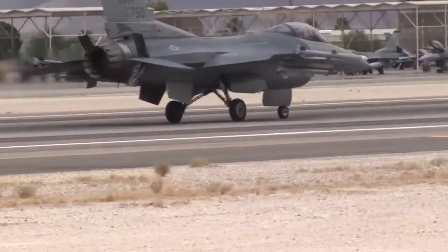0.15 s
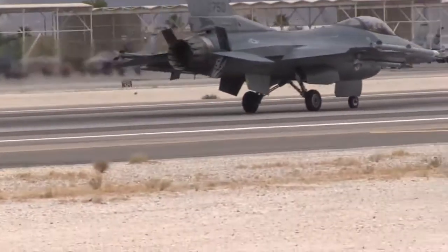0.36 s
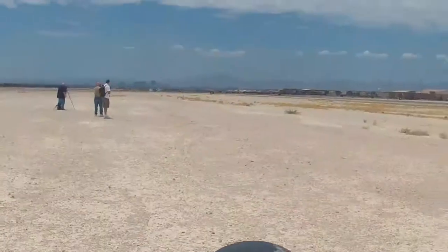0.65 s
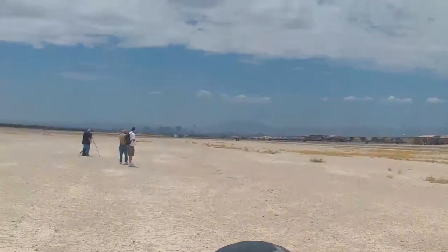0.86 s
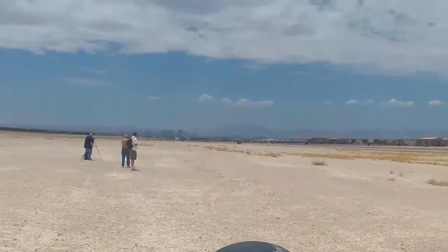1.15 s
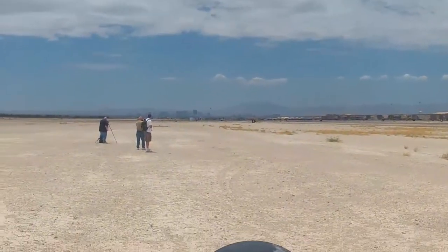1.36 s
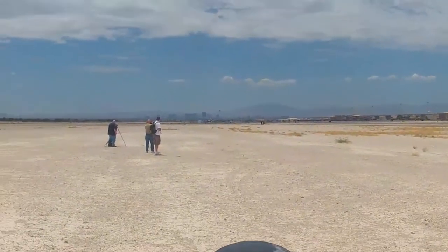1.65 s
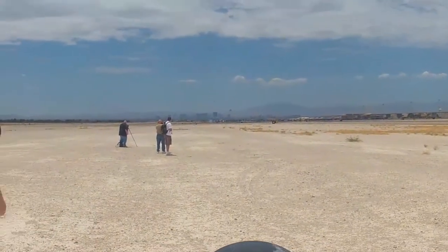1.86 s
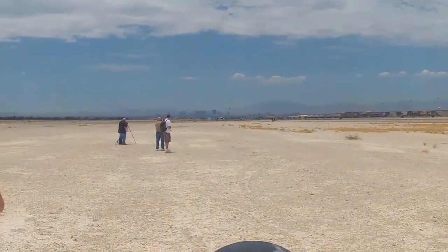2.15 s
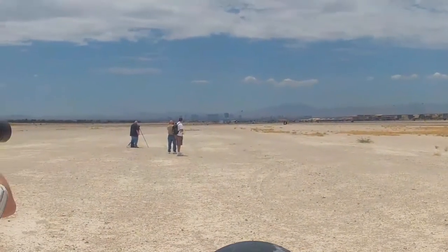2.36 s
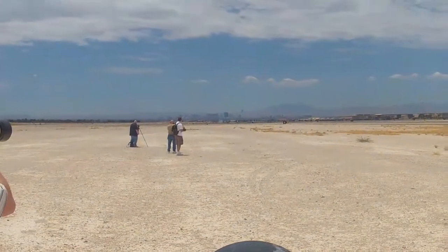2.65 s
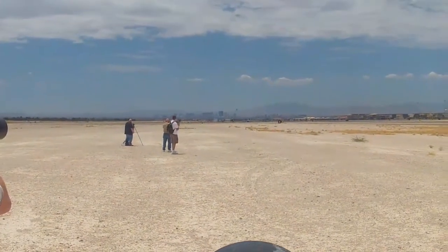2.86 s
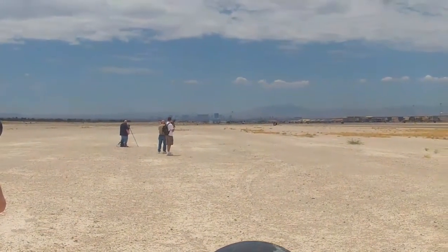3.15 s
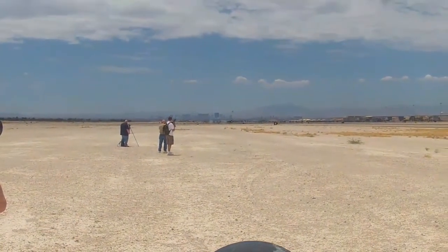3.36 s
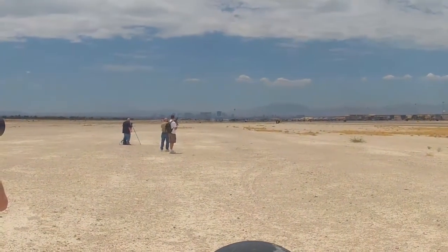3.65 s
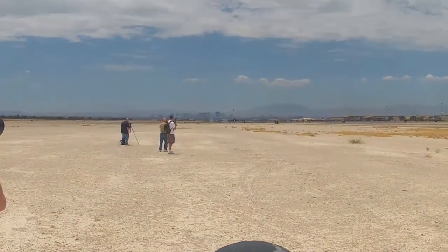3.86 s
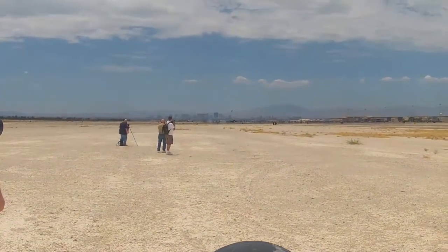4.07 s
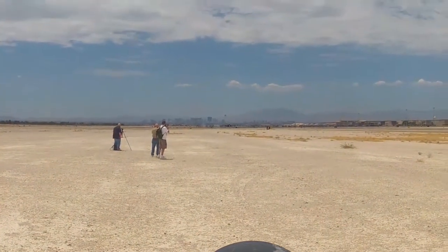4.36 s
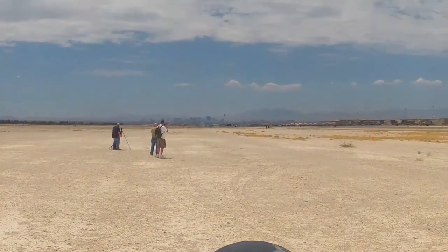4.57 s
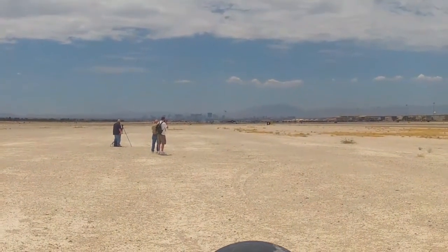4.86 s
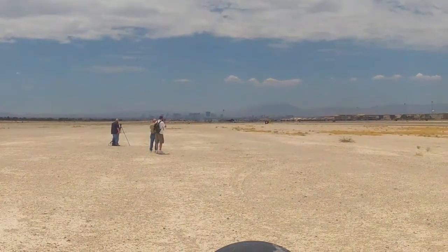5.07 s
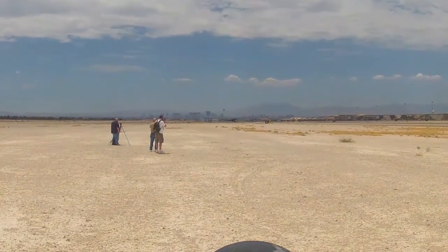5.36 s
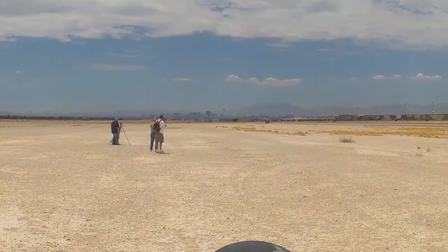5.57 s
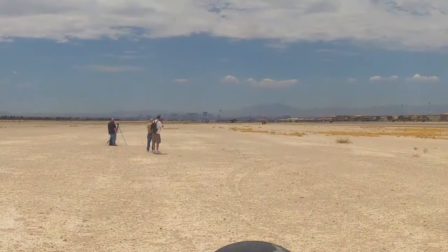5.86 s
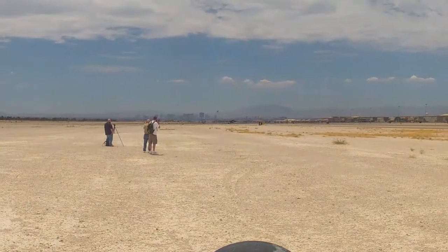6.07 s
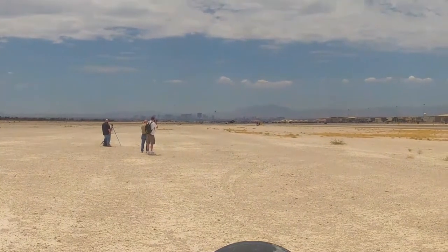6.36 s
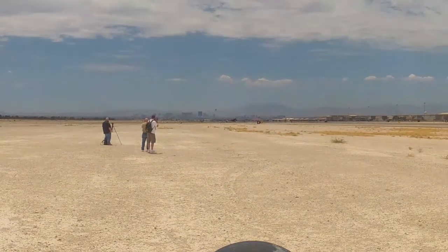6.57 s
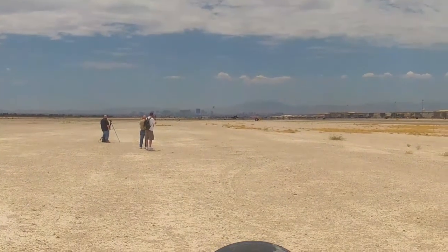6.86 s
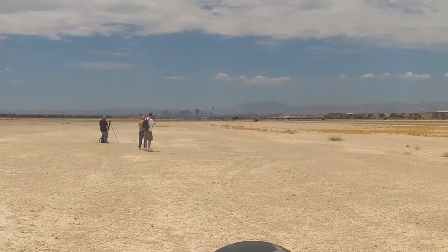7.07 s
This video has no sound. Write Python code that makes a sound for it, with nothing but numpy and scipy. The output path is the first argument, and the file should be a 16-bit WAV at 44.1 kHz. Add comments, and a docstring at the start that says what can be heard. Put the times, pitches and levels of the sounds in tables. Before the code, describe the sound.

A short, loud jet rush gives way abruptly to quiet airfield rumble, with far helicopter blades and close taps on plastic.

```python
"""Beside a runway, in stereo: a fighter jet rolls out, exhaust roaring and turbine whining.
An abrupt cut leads to a quiet desert airfield, heard in mono on a small camera's microphone.
Far engines rumble, and a helicopter slowly comes nearer, its blades slapping the air.
Right at the microphone, the plastic case is knocked and rubbed; the camera hisses and starts to hum."""
import sys
import numpy as np
from scipy import signal
from scipy.fft import rfft, irfft, next_fast_len
from scipy.io import wavfile
from scipy.ndimage import map_coordinates

SR = 44100
rng = np.random.default_rng(int(sys.argv[2]) if len(sys.argv) > 2 else 0)


def store_pcm(level_fs):
    """Save levels as 16-bit WAV."""
    pcm = np.round(np.clip(level_fs, -1, 1) * 32767).astype(np.int16)
    wavfile.write(sys.argv[1], SR, np.atleast_2d(pcm).T)


N = 317961

# Spectra give shape only: their density_db is a relative level per Hz.
# exhaust roar: freq_hz, density_db
EXHAUST_SPECTRUM = [(30, -49), (65, -30), (110, -16), (170, -5.5), (235, 0), (330, -8.5), (550, -13.5),
                    (630, -8), (710, -17), (820, -11), (930, -20.5), (1500, -77), (6000, -110)]
# turbulent rush of the jet: freq_hz, density_db
RUSH_SPECTRUM = [(500, -40), (1000, 1), (1250, 4.5), (1800, -1.5), (2150, -1), (3400, -4), (3900, -2.5),
                 (4200, 4), (4500, -2), (4900, -0.5), (5300, -7), (7600, -14.5), (9000, -15.5),
                 (11000, -34.5), (11400, -90)]
# two strong fan tones, at FAN_HZ: level_db, wander_hz, swing_at_s, swing_db
FAN_TONES = [(-26.5, 7.6, 0.23, -14), (-29.5, 9.6, 0.24, 2)]
# weaker compressor tones: pitch_hz, level_db, wander_hz
COMPRESSOR_TONES = [(2180, -42, 8), (2672, -38, 5), (3483, -45, 8), (3758, -45, 8), (4985, -41, 14)]
# how alike the jet's noise is left and right: freq_hz, correlation
JET_COHERENCE = [(60, 0.96), (180, 1), (550, 0.88), (1650, 0.65), (4970, 0.89), (15000, 1)]
# where the jet sits in the stereo image: freq_hz, left_minus_right_db
JET_BALANCE = [(700, -4.5), (1300, -0.5), (2400, 0.5)]
# main rotor from afar: freq_hz, density_db
ROTOR_SPECTRUM = [(20, -17), (60, 0.5), (200, -3.5), (450, -0.5), (700, -3.5), (820, -8), (950, -26.5),
                  (1800, -19), (2500, -61), (5000, -100)]
# tail rotor harmonics 1-5: relative_db
TAIL_HARMONICS = [-6.5, -23, -5.5, -5.5, -34]
# fingers tap the case: start_s, snap_db, knock_db
FINGER_TAPS = [(0.493, -31.5, -47), (0.59, -32, -11), (0.61, -32.5, -30), (1.278, -40, -40),
               (1.401, -29.5, -45), (1.475, -40, -30), (1.561, -41, -30), (1.603, -41, -29.5),
               (1.705, -45, -26), (1.755, -42, -22), (3.128, -43, -23.5), (3.371, -37, -28.5),
               (3.471, -37.5, -26.5), (4.633, -30.5, -40), (7.141, -6.5, -14), (7.153, -14.5, -18)]
# fingers rub the case: start_s, length_s, snap_db, knock_db
FINGER_RUBS = [(1.857, 0.104, -39.5, -33), (7.129, 0.014, -28, -36), (7.187, .03, -19.5, -31)]
# spells of light brushes as the grip shifts: start_s, end_s, snap_db, knock_db
GRIP_SHIFTS = [(0.651, 5.5, -47.5, -42), (1.399, 1.82, -48, -40.5)]
# snap of a contact on plastic: freq_hz, density_db
SNAP_SPECTRUM = [(300, -17.5), (650, -2.5), (1200, -24), (1700, 7), (2400, -1.5), (3000, -11), (3700, -2.5),
                 (4700, -8.5), (6000, -30.5)]
# bright modes of the case: pitch_hz, width_hz, relative_db
BRIGHT_MODES = [(600, 150, -0.5), (1760, 280, 7.5), (3420, 650, -7)]
# low modes of the case: pitch_hz, width_hz, relative_db
LOW_MODES = [(234, 17, -9), (373, 37, 1.5), (468, 58, 2), (768, 92, 3)]
# soft thuds of the mount: start_s, pitch_hz, level_db, t60_s
MOUNT_THUDS = [(0.593, 231, -20.5, 0.17), (3.519, 313, -24.5, 0.12), (7.143, 196, -28, 0.078)]
# deep boom of the far engines: freq_hz, density_db
BOOM_SPECTRUM = [(12, -17), (24, -23), (33, 3), (62, 2), (90, 3), (200, -61), (1000, -100)]
# rumble of the far engines: freq_hz, density_db
RUMBLE_SPECTRUM = [(40, -8), (75, -2.5), (105, 1), (140, -2), (190, -2.5), (290, -6.5), (400, -11.5),
                   (620, -22), (790, -16.5), (870, -26.5), (1300, -36.5), (4000, -100)]
# the camera's noise floor: freq_hz, density_db
HISS_SPECTRUM = [(300, -30), (900, 3.5), (1250, -3.5), (1800, 5.5), (2900, 3), (3700, -11), (4200, -3),
                 (4600, -14), (6000, -32)]
# narrow resonances in the hiss: pitch_hz, width_hz, relative_db
HISS_BANDS = [(2160, 100, -2.5), (3317, 270, -12.5)]
# electric hum: pitch_hz, level_db, wander_hz
HUM_TONES = [(500, -49.5, .4), (775.2, -43.7, .15)]

CUT_S = 0.448  # from the runway to the desert airfield
FAN_HZ = (2638, 4172)


def jet_exhaust(roar_db=-16.5, rush_db=-20, sizzle_hz=5600):
    """The jet at steady idle power: a low exhaust roar under a turbulent rush."""
    roar = amp(roar_db + 0.59 * wobble(33)) * jet_noise(EXHAUST_SPECTRUM)
    rush = amp(rush_db + wobble(40)) * jet_noise(RUSH_SPECTRUM)
    sizzle = filtered(rush, lambda hz: hz > sizzle_hz)
    flicker = amp(2.6 * wobble(44.5))  # the treble flickers on its own
    return roar + rush + sizzle * (flicker - 1)


def jet_turbine(flutter_db=2, swing_s=0.036):
    """Blade tones flutter in the hot air; each fan tone fades or swells once as the jet passes."""
    whine = np.zeros(N)
    for hz, (db, wander_hz, at_s, swing_db) in zip(FAN_HZ, FAN_TONES):
        swing = np.exp(-((clock() - at_s) / swing_s) ** 2)
        level_db = db + swing_db * swing + flutter_db * wobble(59.5)
        whine += amp(level_db) * tone(hz + wander_hz * wobble(163))
    for hz, db, wander_hz in COMPRESSOR_TONES:
        whine += amp(db + flutter_db * wobble(15)) * tone(hz + wander_hz * wobble(124))
    return whine


def jet_noise(spectrum):
    """Mid-side noise of rms 1, partly alike left and right."""
    width = lambda hz: np.arccos(np.clip(along(JET_COHERENCE, hz), 0, 1)) / 2
    mid = filtered(noise(spectrum), lambda hz: np.cos(width(hz)))
    side = filtered(noise(spectrum), lambda hz: np.sin(width(hz)))
    return unit(np.array([mid + side, mid - side]))


def helicopter(near_db=-38.5, near_s=7.46, rise_db_per_s=2.5):
    """A distant helicopter: both rotors grow louder as it nears the microphone."""
    rotors = main_rotor() + amp(-1) * tail_rotor()
    level_db = near_db - rise_db_per_s * np.maximum(near_s - clock(), 0)
    return amp(level_db + 0.67 * wobble(3.07)) * rotors


def main_rotor(blade_hz=17.25, smear_t60_s=0.13, softest_s=5.55, cycle_s=0.945):
    """Every main blade slaps the air and drags a swish; the slap hardens and softens in turn."""
    passes = np.cumsum(blade_hz + 0.022 * wobble(1.52)) / SR
    beats = np.diff(np.floor(passes), prepend=0) * amp(3.1 * wobble(13))
    # the long path over the ground smears each slap in time without colouring it
    t = np.arange(SR // 12) / SR
    scatter = rfft(rng.standard_normal(len(t)) * amp(-60 * t / smear_t60_s))
    slaps = unit(convolved(beats, irfft(scatter / np.abs(scatter))))
    slaps *= amp(-0.5 * np.cos(2 * np.pi * (clock() - softest_s) / cycle_s))
    swish = unit(rng.standard_normal(N) * amp(-8 * (passes % 1)))
    return unit(filtered(slaps + swish, lambda hz: amp(along(ROTOR_SPECTRUM, hz))))


def tail_rotor(blade_hz=79.5):
    """The tail rotor drones on harmonics of its blade rate."""
    pitch_hz = blade_hz + 0.25 * wobble(3)
    return sum(amp(db + 0.78 * wobble(5.3)) * tone(k * pitch_hz)
               for k, db in enumerate(TAIL_HARMONICS, 1))


def finger_contacts(tap_t60_s=0.035, rub_ramp_s=0.0085, grit_db=3):
    """Friction and firm pushes of the fingers on the case, each as a snap row and a knock row."""
    t = clock()
    friction, pushes = np.zeros((2, 2, N))
    brushes = [(s, snap_db, knock_db) for start_s, end_s, snap_db, knock_db in GRIP_SHIFTS
               for s in rng.uniform(start_s, end_s, size=12)]
    for start_s, snap_db, knock_db in FINGER_TAPS + brushes:
        strength = amp([snap_db, knock_db])
        decay = (t >= start_s) * amp(-60 * np.clip(t - start_s, 0, 0.5) / tap_t60_s)
        friction += np.outer(strength, decay)
        pushes[:, round(start_s * SR)] += strength
    for start_s, length_s, snap_db, knock_db in FINGER_RUBS:
        stroke = np.clip(np.minimum(t - start_s, start_s + length_s - t) / rub_ramp_s, 0, 1)
        grit = unit(amp(grit_db * wobble(390)))
        friction += np.outer(amp([snap_db, knock_db]), stroke * grit)
    return friction, pushes


def case_handling(soft_hz=860):
    """Handling noise right at the microphone: a gritty snap, a short bright ring, a hollow knock."""
    friction, (hard_push, soft_push) = finger_contacts()
    # each contact is a run of tiny slips in either direction
    hard_slips, soft_slips = friction * np.sign(rng.standard_normal((2, N)))
    hz = np.fft.rfftfreq(8192, 1 / SR)
    shell = irfft(resonances(BRIGHT_MODES, hz) / (1 + 1j * hz / 9000) ** 2)
    soft_finger = signal.butter(6, soft_hz, fs=SR, output="sos")  # excites only the low modes
    body = signal.sosfilt(soft_finger, irfft(resonances(LOW_MODES, hz)))
    edge = (friction[0] / friction[0].max() + 1e-9) ** 0.33  # harder contacts are brighter
    snap = convolved(1.01 * edge * hard_slips, impulse(SNAP_SPECTRUM))
    ring = convolved(0.76 * hard_slips + 3.4 * hard_push, shell)
    knock = convolved(0.72 * soft_slips + 3 * soft_push, body)
    return snap + ring + knock


def mount_thuds(attack_s=0.0014):
    """Each jolt sets the camera mount ringing briefly at one low pitch."""
    thuds = np.zeros(N)
    for start_s, hz, db, t60_s in MOUNT_THUDS:
        age_s = since(start_s)
        envelope = amp(db - 60 * age_s / t60_s) * (1 - np.exp(-age_s / attack_s))
        thuds += envelope * np.sin(2 * np.pi * hz * age_s)
    return thuds


def far_engines(boom_db=-39, rumble_db=-37, built_up_s=1.74):
    """Only boom and rumble carry from far jet engines; both build up, then the boom slowly recedes."""
    early_s = np.maximum(built_up_s - clock(), 0)
    boom_gain = amp(boom_db - 8 * early_s - 0.87 * since(built_up_s))
    rumble_gain = amp(rumble_db - 4 * early_s + 0.8 * wobble(9))
    return boom_gain * noise(BOOM_SPECTRUM) + rumble_gain * noise(RUMBLE_SPECTRUM)


def camera_hiss(hiss_db=-56, ring_db=-53):
    """The camera's own noise floor: hiss with narrow ringing bands."""
    bands = lambda hz: sum(amp(db) * np.abs(resonances([(pitch, width, 0)], hz)) ** 2
                           for pitch, width, db in HISS_BANDS)
    ringing = unit(filtered(rng.standard_normal(N), bands))
    return amp(hiss_db) * noise(HISS_SPECTRUM) + amp(ring_db) * ringing


def camera_hum(start_s=1.86, attack_s=0.026, sag_from_s=4.7, sag_db_per_s=0.74):
    """An electric hum sets in, holds and later softens."""
    envelope = np.minimum(since(start_s) / attack_s, 1) * amp(-sag_db_per_s * since(sag_from_s))
    return envelope * sum(amp(db + 1.1 * wobble(4)) * tone(hz + wander_hz * wobble(6))
                          for hz, db, wander_hz in HUM_TONES)


def sample_and_hold(x, rate_hz=12000):
    """The camera samples slowly and holds each value, mirroring its sound faintly around that rate."""
    narrow = filtered(x, lambda hz: hz < rate_hz / 2)
    slope = filtered(narrow, lambda hz: 1j * hz)
    mirrored = slope * 2 * np.cos(2 * np.pi * rate_hz * clock())
    return narrow + filtered(mirrored, lambda hz: 1 / (1j * np.maximum(hz, rate_hz / 2)))


def amp(db):
    """Decibels to gain."""
    return 10 ** (np.asarray(db) / 20)


def unit(x):
    """Scaled to rms 1."""
    return x / np.sqrt(np.mean(x ** 2) + 1e-20)


def clock():
    """The time of every sample, in seconds."""
    return np.arange(N) / SR


def since(start_s):
    """Seconds since start_s, zero before it."""
    return np.maximum(clock() - start_s, 0)


def along(points, hz):
    """(freq_hz, value) points interpolated on a log axis."""
    freqs, values = np.transpose(points)
    return np.interp(np.log(hz + 1), np.log(freqs + 1), values)


def wobble(rate_hz):
    """A smooth random curve with rate_hz knots a second."""
    return map_coordinates(rng.standard_normal(int(N * rate_hz / SR) + 4), [clock() * rate_hz])


def filtered(x, response):
    """x through a complex response of frequency."""
    size = next_fast_len(N + SR // 2)
    return irfft(rfft(x, size) * response(np.fft.rfftfreq(size, 1 / SR)), size)[..., :N]


def convolved(x, pulse):
    """x through an impulse response scaled to energy 1."""
    return signal.fftconvolve(x, pulse / np.linalg.norm(pulse))[:N]


def noise(spectrum):
    """Coloured noise of rms 1."""
    return unit(filtered(rng.standard_normal(N), lambda hz: amp(along(spectrum, hz))))


def resonances(modes, hz):
    """Causal response of (pitch_hz, width_hz, level_db) modes of alternating sign."""
    return sum((-1) ** k * amp(db) * 1j * hz * width / (pitch ** 2 - hz ** 2 + 1j * hz * width)
               for k, (pitch, width, db) in enumerate(modes))


def impulse(spectrum, size=4096):
    """A minimum-phase pulse with the given colour."""
    cepstrum = irfft(np.log(amp(along(spectrum, np.fft.rfftfreq(size, 1 / SR)))))
    cepstrum[1:size // 2] *= 2
    cepstrum[size // 2 + 1:] = 0
    return irfft(np.exp(rfft(cepstrum)))


def tone(hz):
    """A sine of rms 1 on a pitch curve."""
    return np.sqrt(2) * np.sin(2 * np.pi * (np.cumsum(hz) / SR + rng.random()))


def scene():
    """The runway in stereo, then the desert airfield in mono through the small camera."""
    distant = far_engines() + helicopter()
    close = camera_hiss() + camera_hum() + case_handling() + mount_thuds()
    airfield = sample_and_hold(distant + close)
    balance = lambda hz: amp(np.outer([0.5, -0.5], along(JET_BALANCE, hz)))
    runway = filtered(jet_exhaust() + jet_turbine(), balance)
    cut_out = np.clip((CUT_S - clock()) / 0.00081, 0, 1)
    cut_in = np.minimum(since(CUT_S) / 0.0069, 1) ** 2
    return runway * cut_out + airfield * cut_in


def record(dry, top_hz=15500):
    """Nothing is kept above the band limit."""
    return filtered(dry, lambda hz: hz < top_hz)


dry = scene()
out = record(dry)
store_pcm(out)
```